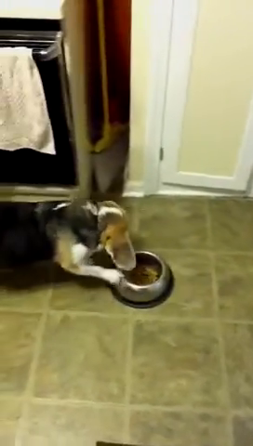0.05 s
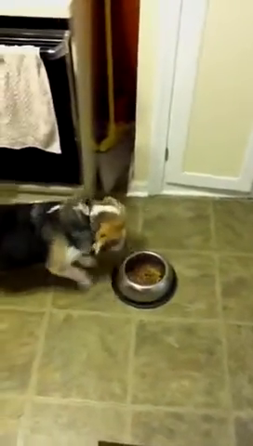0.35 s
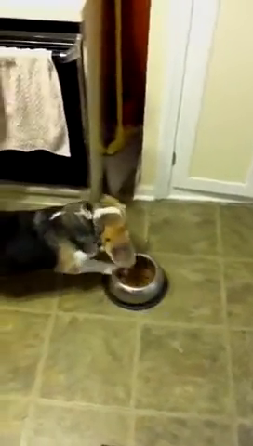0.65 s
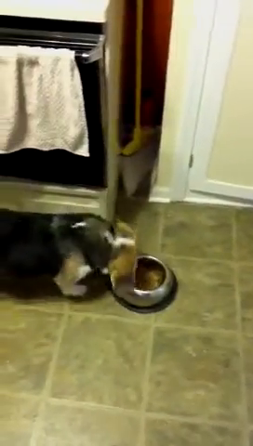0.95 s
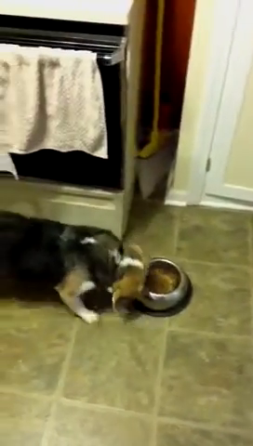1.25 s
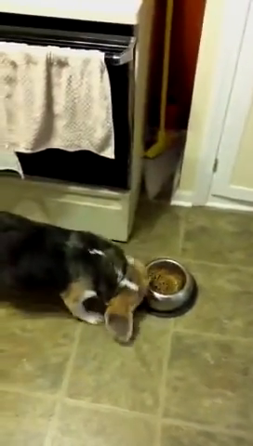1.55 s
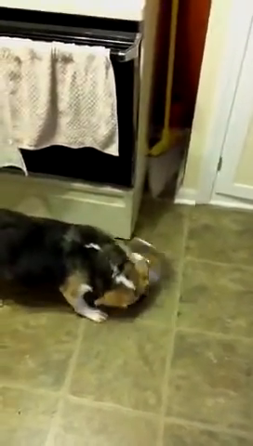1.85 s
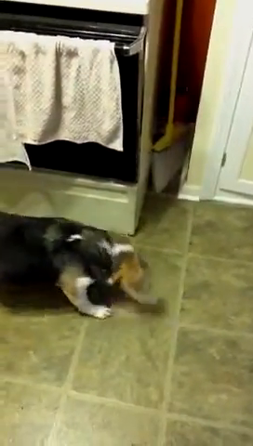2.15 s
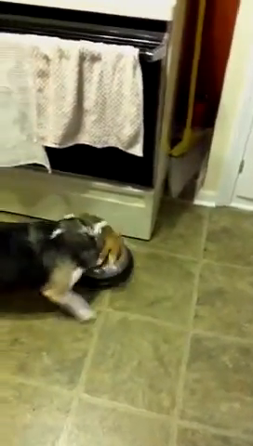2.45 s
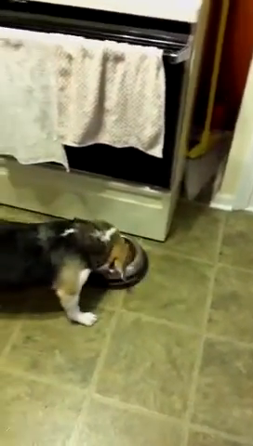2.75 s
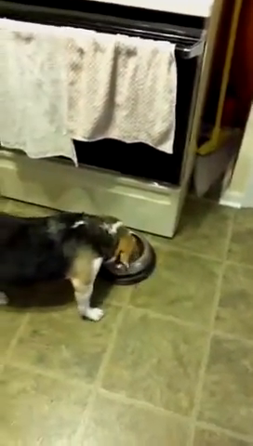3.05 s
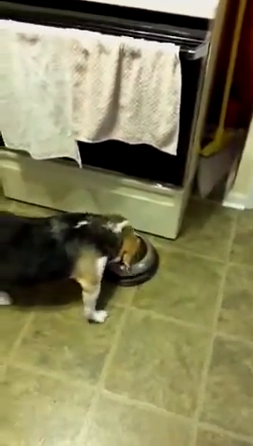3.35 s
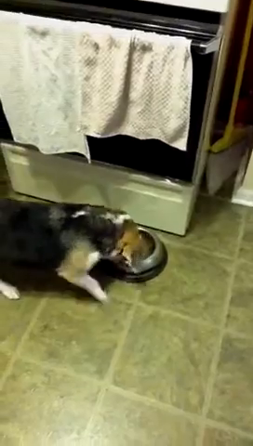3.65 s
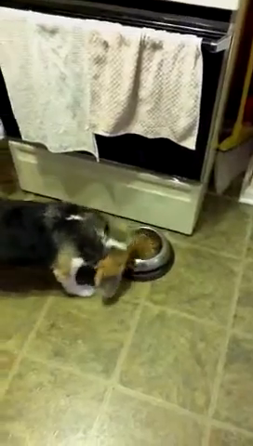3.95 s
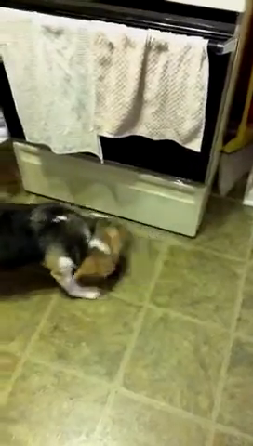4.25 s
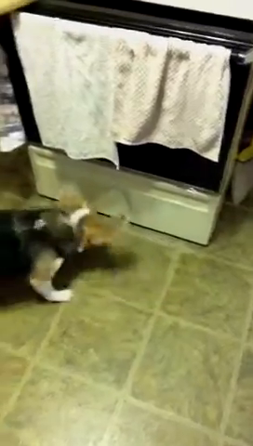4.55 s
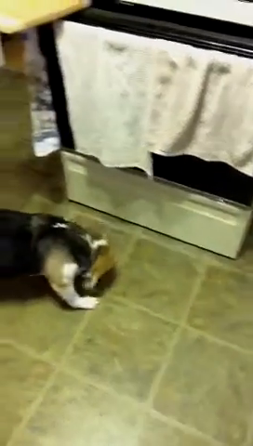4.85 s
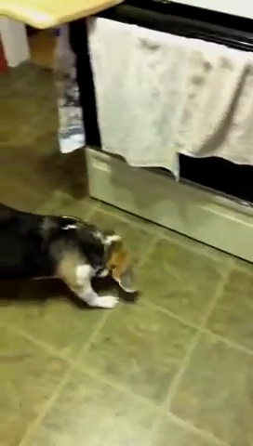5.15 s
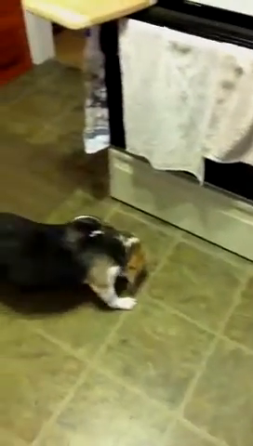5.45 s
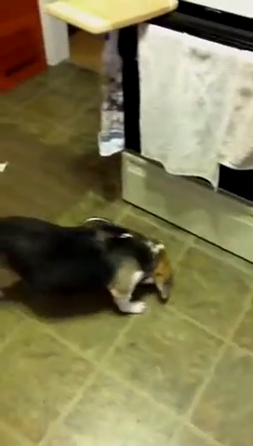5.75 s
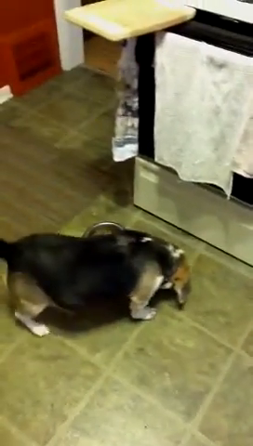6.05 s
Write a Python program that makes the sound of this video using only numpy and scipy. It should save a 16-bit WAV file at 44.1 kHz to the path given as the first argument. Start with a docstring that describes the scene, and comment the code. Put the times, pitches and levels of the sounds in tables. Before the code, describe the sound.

A dog shoves a steel bowl over a hard floor, kibble rattling and tags jingling, with one booming bang against a metal stove drawer.

```python
"""In a small, hard kitchen, a dog paws a steel bowl over the floor while a refrigerator hums.
Stick-slip friction makes the bowl scrape, judder and groan, and the dry kibble in it rattles and crunches.
Collar tags jingle and metal clinks on the rim. One shove bangs the bowl into the stove's sheet-metal
drawer, whose lightly damped modes boom on. One microphone hears it all."""
import sys
import numpy as np
from scipy import signal
from scipy.fft import rfft, irfft, next_fast_len
from scipy.io import wavfile
from scipy.ndimage import uniform_filter1d, map_coordinates

SR = 44100
rng = np.random.default_rng(int(sys.argv[2]) if len(sys.argv) > 2 else 0)


def file_out(sig):
    """Save sig as 16-bit WAV at sys.argv[1]."""
    # one column per channel
    cols = np.atleast_2d(sig).T
    # limit, then scale
    lim = np.clip(cols, -1, 1)
    pcm = np.round(lim * 32767).astype(np.int16)
    wavfile.write(sys.argv[1], SR, pcm)


N = 273552
TIME = np.arange(N) / SR


def amp(db):
    """Decibels to amplitude ratio."""
    return 10 ** (np.asarray(db) / 20)


def unit(x):
    """Normalisation to rms 1."""
    return x / np.sqrt(np.mean(x ** 2) + 1e-20)


def fade(t, t60):
    """Exponential decay, 60 dB in t60 seconds."""
    return np.exp(-np.log(1000) * t / t60)


def swell(start, rise, length, t60):
    """Envelope: a linear rise, held until length is over, then free decay."""
    t = TIME - start
    return np.clip(t / rise, 0, 1) * fade(np.maximum(t - length, 0), t60)


def along(points, hz):
    """Interpolation of (Hz, value) points on a log frequency axis."""
    freqs, values = np.transpose(points)
    return np.interp(np.log(hz + 1), np.log(freqs), values)


def filtered(x, response):
    """Linear filtering: the spectrum is multiplied by a frequency response."""
    size = next_fast_len(len(x) + SR // 2)
    return irfft(rfft(x, size) * response(np.fft.rfftfreq(size, 1 / SR)), size)[:len(x)]


def coloured(x, spectrum):
    """Spectral shaping by (Hz, dB) points, at rms 1."""
    return unit(filtered(x, lambda hz: amp(along(spectrum, hz))))


def resonate(x, peaks):
    """Forced response of damped resonators of alternating sign, at rms 1."""
    def body(f):
        return sum((-1) ** k * amp(db) * 1j * f * width / (hz * hz - f * f + 1j * f * width)
                   for k, (hz, width, db) in enumerate(peaks))
    return unit(filtered(x, body))


def no_bass(x):
    """Radiation efficiency: small bodies give off no deep bass."""
    return signal.sosfilt(signal.butter(4, 108, "high", fs=SR, output="sos"), x)


def wobble(rate):
    """Smooth random modulation, rate knots a second."""
    coarse = TIME[::32]
    knots = rng.standard_normal(int(N * rate / SR) + 4)
    return np.interp(TIME, coarse, map_coordinates(knots, [coarse * rate]))


def impacts(rate, spread_db):
    """Shot noise: random impulses, on average rate a second."""
    impulses = (rng.random(N) < rate / SR) * rng.choice([-1, 1], N)
    return impulses * amp(spread_db * np.clip(rng.standard_normal(N), -2, 2))


def ring(modes, t, scatter_db):
    """Free vibration: a sum of decaying modes, each with random strength and phase."""
    return sum(amp(db + scatter_db * rng.standard_normal()) * fade(t, t60)
               * np.sin(2 * np.pi * (hz * t + rng.random())) for hz, db, t60 in modes)


def bursts(events, spectrum, t60):
    """Modal overlap: contacts whose modes are too dense to resolve sound as decaying noise."""
    track, t = np.zeros(N), TIME[:SR // 3]
    for start, db in events:
        add(track, start, amp(db) * fade(t, t60) * coloured(rng.standard_normal(len(t)), spectrum))
    return track


def add(track, start, sound):
    """Superposition: a sound joins the track at start seconds."""
    part = track[max(round(start * SR), 0):][:len(sound)]
    part += sound[:len(part)]


# The kitchen's reverberation. Each row: frequency in Hz, t60 in seconds.
KITCHEN_DECAY = [(150, 0.91), (1000, 0.4), (5000, 0.35), (9000, 0.32), (15000, 0.23)]

def room(x, wet_db):
    """Reverberation: a diffuse tail, its treble dying first, shares the power with the direct sound."""
    hz, t, noise = signal.stft(rng.standard_normal(SR // 2), SR, nperseg=256)
    tail = signal.istft(noise * fade(t, along(KITCHEN_DECAY, hz)[:, None]), SR, nperseg=256)[1]
    tail = np.pad(tail / np.linalg.norm(tail), (SR // 400, 0))  # 2.5 ms behind the direct sound
    return (x + amp(wet_db) * signal.fftconvolve(x, tail)[:N]) / np.hypot(1, amp(wet_db))


# The motor's tones. Each row: frequency in Hz, level in dB.
MOTOR_TONES = [(60, -85), (120, -69), (177.6, -61), (236.9, -57), (306.8, -60), (360.2, -61),
               (947.5, -73.5), (1244, -73.5), (1303, -79)]
# The fan's rush. Each row: frequency in Hz, relative density in dB.
FAN_SPECTRUM = [(25, -10), (55, -16), (100, -20.5), (130, -8), (185, 0), (310, 2.5), (450, -5),
                (700, -14.5), (1200, -16), (2000, -25.5), (4000, -28), (9000, -31), (15000, -33.5)]

def refrigerator():
    """Machine noise: slightly unsteady motor tones stand over the broadband rush of a fan."""
    hum = sum(amp(db + 2.2 * wobble(2.874)) * np.sqrt(2)
              * np.sin(2 * np.pi * hz * TIME + .5 * wobble(4.015)) for hz, db in MOTOR_TONES)
    return hum + amp(-51) * coloured(rng.standard_normal(N), FAN_SPECTRUM)


# Tags strike (short rise) or chatter (long rise). Each row: start in seconds, level in dB, rise in seconds.
TAG_STRIKES = [(.401, -33.5, .001), (0.457, -38.5, .005), (1.0072, -51.5, .003), (1.5705, -56, .002),
               (2.412, -39, .015), (3.619, -45.5, .006), (4.391, -31, .015), (4.434, -37, .01),
               (4.499, -25, .001), (4.657, -35, .003), (4.738, -40.5, .008), (4.771, -33, .03),
               (5.3788, -58, .002), (5.616, -48, .006), (5.68, -55, .02)]
# The tags' modes. Each row: frequency in Hz, relative level in dB, t60 in seconds.
TAG_MODES = [(4540, -19, .4), (7360, -30, .2), (9790, -18, .2), (11935, -5, .24), (12210, -10, .15),
             (12600, -9, .18), (13910, -1.5, .17)]
# Their first touch. Each row: frequency in Hz, relative density in dB.
TAG_TOUCH_SPECTRUM = [(2000, -19), (9000, -4.5), (11000, -2), (12200, 3), (13100, -20), (14000, -13),
                      (15000, -22)]

def tags():
    """Plate vibration: thin tags ring very high, and repeated contact modulates the ring to a shimmer."""
    track, t = np.zeros(N), TIME[:SR // 2]

    def flutter(rate=420):
        return np.interp(t * rate, np.arange(rate), rng.standard_normal(rate))

    for start, db, rise in TAG_STRIKES:
        for hz, mode_db, t60 in TAG_MODES:
            envelope = np.clip(t / rise, 0, 1) * fade(np.maximum(t - rise, 0), t60)
            strength_db = db + mode_db + 2 * rng.standard_normal() + 3 * flutter()
            pitch = hz * (1 + .003 * rng.standard_normal())
            phase = 2 * np.pi * (pitch * t + rng.random()) + flutter()
            add(track, start, amp(strength_db) * envelope * np.sin(phase))
    touches = [(start + rise / 2, db) for start, db, rise in TAG_STRIKES]
    return track + room(amp(4.5) * bursts(touches, TAG_TOUCH_SPECTRUM, t60=0.017), wet_db=5)


# Collar metal hits or slides on the rim. Each row: start in seconds, level in dB, rise in seconds.
RIM_CONTACTS = [(0.236, -39, 0.011), (.4837, -39, 0.0011), (0.4903, -29, 0.00033), (0.508, -33.5, 0.00092),
                (.576, -33, 0.013), (.716, -35, .003), (1.658, -32.5, 0.00053), (1.91, -27.5, .004),
                (2.123, -36.5, 0.0034), (3.9402, -38, 0.00044), (4.0141, -31.5, .0003), (4.328, -36, 0.03),
                (4.863, -40.5, 0.0051)]
# The metal's clink. Each row: frequency in Hz, relative density in dB.
CLINK_SPECTRUM = [(500, -39), (1500, -9.5), (2600, -15.5), (4000, -14.5), (6000, -14), (7300, 9), (8200, 0),
                  (9500, 0), (12500, 1), (15500, -6)]
# The rim's modes. Each row: frequency in Hz, relative level in dB, t60 in seconds.
RIM_MODES = [(1010, -21.5, 0.2), (1503, -22, 0.16), (2630, -33.5, 0.59), (7300, -22, 0.14)]

def clinks():
    """Contact damping: collar metal held against the rim dies at once; the rim rings a little longer."""
    rim, metal, t = np.zeros(N), np.zeros(N), TIME[:SR // 4]
    for start, db, rise in RIM_CONTACTS:
        onset = amp(db) * np.clip(t / rise, 0, 1)
        snap = amp(8.5) * fade(t, 0.011)  # prominent only in a hard touch
        decay = fade(np.maximum(t - rise, 0), 0.044) + snap
        add(metal, start, onset * decay * coloured(rng.standard_normal(len(t)), CLINK_SPECTRUM))
        add(rim, start, onset * ring(RIM_MODES, t, scatter_db=7.5))
    return rim + room(amp(1) * metal, wet_db=2.5)


# Soft blows on the bowl. Each row: start in seconds, level in dB, frequency in Hz, t60 in seconds.
PAW_BLOWS = [(0.257, -11.5, 197, 0.041), (0.283, -24, 200, 0.081), (0.632, -25.5, 188.8, 0.32),
             (0.669, -28, 186, .1), (1.762, -25.5, 201, 0.13), (1.803, -15.5, 195, 0.17),
             (4.589, -26.5, 226, 0.27)]

def paw():
    """Compliant impact: a padded paw excites only a low tone with a soft start."""
    track, t = np.zeros(N), TIME[:SR // 3]
    onset = 1 - np.exp(-(t / 0.0078) ** 2)
    for start, db, hz, t60 in PAW_BLOWS:
        add(track, start, amp(db) * onset * fade(t, t60) * np.sin(2 * np.pi * hz * t))
    return room(track, wet_db=-10)


# The bowl's brief rings. Each row: start in seconds, level in dB.
BOWL_RINGS = [(.255, -49), (1.09, -47.5), (1.66, -35.5), (2.309, -36), (2.541, -44), (3.941, -46.5),
              (4.014, -50)]
# The bowl's resonances. Each row: centre in Hz, bandwidth in Hz, relative gain in dB.
BOWL_RESONANCES = [(546, 100, -2), (752, 77, 2), (941, 120, 2.5), (1173, 107, -2.5), (1400, 160, -4),
                   (1780, 170, -5), (2475, 480, -9)]

def bowl_ring():
    """Damped resonance: the bowl rings briefly as it clacks on the floor or collar metal hits its rim."""
    envelope = sum(amp(db) * (TIME >= start) * fade(np.abs(TIME - start), t60=0.13)
                   for start, db in BOWL_RINGS)
    return room(envelope * resonate(rng.standard_normal(N), BOWL_RESONANCES), wet_db=2)


# The sliding base catches. Each row: start in seconds, length in seconds, level in dB, pitch in Hz.
BASE_CATCHES = [(0.602, 0.058, -44, 1020), (0.682, .14, -42.5, 960), (0.748, 0.019, -33, 970),
                (4.246, 0.025, -35.5, 967), (4.343, 0.019, -36.5, 985), (4.411, 0.023, -36, 980)]

def groan():
    """Self-excited oscillation: stick and slip lock onto one bowl mode, unsteady in pitch and grip."""
    track = np.zeros(N)
    for start, length, db, hz in BASE_CATCHES:
        pitch = hz * (1 + .06 * wobble(260))
        grip_db = 3 * wobble(180)
        level = amp(db + grip_db) * swell(start, rise=0.014, length=length, t60=0.078)
        track += level * np.sqrt(2) * np.sin(2 * np.pi * np.cumsum(pitch) / SR)
    return room(track, wet_db=-3)


# Shoves on the bowl. Each row: start in seconds, length in seconds, scrape in dB, judder in dB.
BOWL_SHOVES = [(-.045, 0.042, -39, -48), (0.55, .15, -42, -39.5), (0.71, 0.086, -42, -52),
               (1.752, 0.12, -34, -36), (1.89, .1, -24.5, -31.5), (2.527, 0.044, -43.5, -52),
               (4.12, 0.33, -36.5, -31), (4.496, 0.18, -46.5, -44)]

def push():
    """Power addition: shoves take hold, weaken and coast, summing to scrape and judder envelopes."""
    sag_db_per_s = 19
    power = np.zeros((2, N))
    for start, length, scrape_db, judder_db in BOWL_SHOVES:
        sag_db = sag_db_per_s * np.clip(TIME - start, 0, length)
        shape = swell(start, rise=.045, length=length, t60=0.42) * amp(-sag_db)
        power += (amp([[scrape_db], [judder_db]]) * shape) ** 2
    return np.sqrt(power)


# The floor's resonances. Each row: centre in Hz, bandwidth in Hz, relative gain in dB.
FLOOR_RESONANCES = [(144.8, 21, -4), (202, 17, 1), (255, 13, 1), (315, 33.3, -2)]
# The bowl clacks on the floor. Each row: start in seconds, level in dB.
FLOOR_CLACKS = [(1.0895, -50), (1.9045, -28), (2.1945, -28), (2.24, -22.5), (2.256, -28), (2.309, -30.5),
                (2.541, -33.5), (4.0603, -46)]
# One clack. Each row: frequency in Hz, relative density in dB.
CLACK_SPECTRUM = [(300, -17), (900, -9), (1600, -2), (2000, -8), (2500, 3.5), (3200, -0.5), (4600, 0),
                  (6500, -5.5), (12000, -27)]

def drag(scraping, juddering):
    """Stick-slip friction: fine slips ring the bowl, coarse ones drum on the floor, and the base clacks."""
    scrape = scraping * resonate(impacts(rate=650, spread_db=2), BOWL_RESONANCES)
    drum = resonate(impacts(rate=500, spread_db=0), FLOOR_RESONANCES)
    drum_power = np.abs(uniform_filter1d(drum ** 2, size=SR // 25))
    drum /= np.sqrt(drum_power + 1e-6)  # a steady push keeps the judder even
    clacks = room(bursts(FLOOR_CLACKS, CLACK_SPECTRUM, t60=0.028), wet_db=2)
    return room(scrape, wet_db=-1.5) + clacks + no_bass(juddering * drum)


def pellets(rate, hz, octaves, decay_cycles):
    """Damped oscillation: each pellet ticks for a few cycles at its own pitch; rms 1."""
    when, pitch, size = rng.random((int(rate * N / SR), 3)).T
    t = TIME[:SR // 200]
    cycles = (hz * 2 ** (octaves * (2 * pitch - 1)))[:, None] * t
    ticks = amp(40 * size)[:, None] * np.sin(2 * np.pi * cycles) * np.exp(-cycles / decay_cycles)
    samples = (when * N).astype(int)[:, None] + np.arange(len(t))
    return unit(np.bincount(samples.ravel(), ticks.ravel(), N)[:N])


# The heap gives way and slides across the bowl. Each row: start in seconds, level in dB.
HEAP_SLIDES = [(.015, -38.5), (.695, -38), (.742, -35), (1.935, -30.5), (2.09, -34.5), (2.53, -44),
               (4.15, -36.5), (4.43, -34.5), (4.469, -35.5), (4.715, -41.5)]
# A few pellets crunch. Each row: start in seconds, level in dB.
PELLET_CRUNCHES = [(.283, -47.5), (0.326, -44), (1.088, -57), (1.141, -45.5), (1.225, -47), (2.24, -36),
                   (2.38, -45.5), (2.485, -41.5), (3.69, -44), (3.722, -47), (4.058, -43), (4.991, -43.5),
                   (5.188, -52.5), (5.44, -56.5), (5.582, -53), (5.83, -59.5), (6.004, -48), (6.075, -49.5)]
# Single pellets crack or hit the wall. Each row: start in seconds, level in dB.
PELLET_CRACKS = [(.034, -37), (.2845, -23), (.7623, -27), (1.228, -19), (1.2383, -24), (1.2452, -18.5),
                 (2.24, -22), (3.693, -30), (3.7098, -28.5), (3.7225, -21), (4.36, -26), (4.993, -22.5),
                 (5.582, -29.5), (6.008, -29.5)]
# The dense rattle. Each row: frequency in Hz, relative density in dB.
RATTLE_SPECTRUM = [(300, -30), (900, -2.5), (1600, -1), (2600, 1), (4500, 0), (7000, -1.5), (9000, -4.5),
                   (12000, -6), (15500, -15)]
# One crack. Each row: frequency in Hz, relative density in dB.
CRACK_SPECTRUM = [(400, -13), (2000, -4), (7000, 5.5), (10000, -3.5), (15500, -18)]

def kibble(shaking):
    """Granular noise: collisions from shaking, slides and crunches add in power; hard cracks stand out."""
    power = (amp(-2) * shaking) ** 2
    for events, rise, t60 in (HEAP_SLIDES, 0.029, 0.35), (PELLET_CRUNCHES, 0.0056, 0.33):
        power += sum((amp(db) * swell(start, rise, rise, t60)) ** 2 for start, db in events)
    crumbs = coloured(impacts(rate=3500, spread_db=1.5), RATTLE_SPECTRUM)
    ticks = amp(-10) * pellets(rate=260, hz=3854, octaves=1.14, decay_cycles=6.1)
    cracks = room(amp(-2.5) * bursts(PELLET_CRACKS, CRACK_SPECTRUM, t60=0.0059), wet_db=1.5)
    return room(np.sqrt(power) * (crumbs + ticks), wet_db=-7) + cracks


# The bowl hits the drawer and chatters against it. Each row: start in seconds, level in dB.
DRAWER_HITS = [(1.894, -21), (1.9029, -15), (1.913, -20.5), (1.926, -23.5), (1.948, -19), (1.971, -24.5),
               (1.988, -26.5)]
# The sheet metal's modes. Each row: frequency in Hz, relative level in dB, t60 in seconds.
PANEL_MODES = [(128.5, -8.5, 1.82), (169, -3, 0.4), (191.7, -14, 2.15), (219.2, 6.5, 0.16),
               (270.3, 1.5, 0.51), (289, -10, 1.8), (321, 2, 0.63), (326, 0, 1.61), (348, -2, 1.16),
               (360.5, -2, 0.37), (392, -10, 0.78), (462, -7, 0.57), (538, -12, 0.5), (564.5, -3.5, 0.65),
               (581.6, -7, 1.08), (631, -3, 0.72), (702, -18, 1.36), (800, -25, 0.85), (802, -6.5, 0.61),
               (973, -13, 0.84), (954, -5, 0.46), (1050, -11.5, 0.71), (1160, -8, 0.61), (1300, -15, 0.24)]
# The crash of one contact. Each row: frequency in Hz, relative density in dB.
CRASH_SPECTRUM = [(40, -40), (85, -26), (110, -34), (200, 11.5), (350, 14), (470, 0), (600, 3.5), (920, 5),
                  (1150, -2), (1500, -0.5), (2500, -27), (6000, -25), (15000, -32)]

def drawer():
    """Modal energy storage: each contact crashes briefly and feeds the panel's modes, which boom on."""
    first_hit, t = DRAWER_HITS[0][0], TIME[:2 * SR]
    blows, panel, boom = np.zeros(len(t)), np.zeros(len(t)), np.zeros(N)
    contact = np.ones(SR // 300)  # 3.3 ms long
    for start, db in DRAWER_HITS:
        add(blows, start - first_hit, amp(db - 8) ** 2 * contact / len(contact))
    for hz, db, t60 in PANEL_MODES:
        energy = signal.lfilter([1], [1, -fade(2 / SR, t60)], blows)  # decays twice as fast as amplitude
        bend = 0.55 * wobble(16)[:len(t)] * fade(t, 2.0)  # hard-bent sheet metal rings out of tune
        panel += amp(db) * np.sqrt(energy) * np.sin(2 * np.pi * (hz * t + rng.random()) + bend)
    add(boom, first_hit, amp(-3.5) * panel)
    crash = amp(-0.5) * bursts(DRAWER_HITS, CRASH_SPECTRUM, t60=0.12)
    return no_bass(boom + room(crash, wet_db=4.5))


def scene():
    """Superposition: all sources sum at one microphone, the same on both channels."""
    scraping, juddering = push()
    bowl = kibble(scraping) + drag(scraping, juddering) + groan() + bowl_ring() + paw()
    mono = bowl + drawer() + tags() + clinks() + refrigerator()
    return np.array([mono, mono])


def record(dry):
    """Band limiting: a second-order high-pass thins the deep bass, and a sharp cutoff ends the treble."""
    bass_hz, top_hz = 90, 15400

    def passband(hz):
        return (hz < top_hz) * hz ** 2 / np.hypot(hz ** 2, bass_hz ** 2)
    return np.array([filtered(channel, passband) for channel in dry])


dry = scene()
out = record(dry)
file_out(out)
```